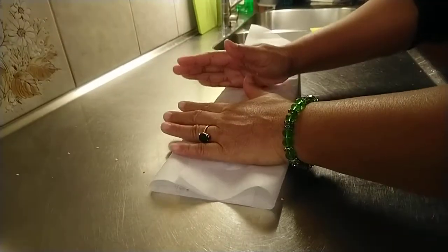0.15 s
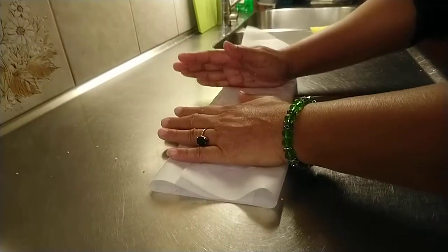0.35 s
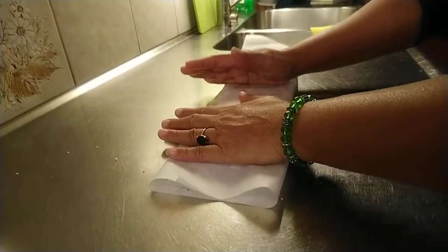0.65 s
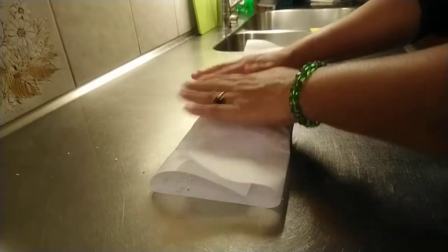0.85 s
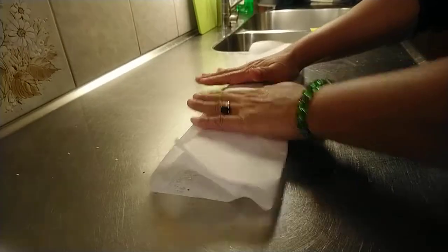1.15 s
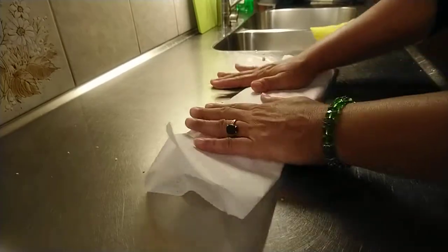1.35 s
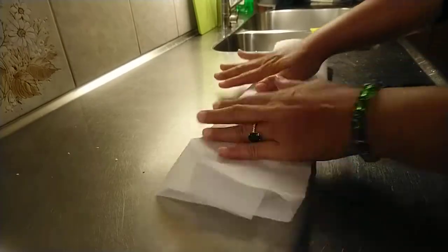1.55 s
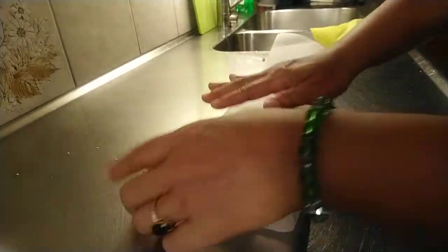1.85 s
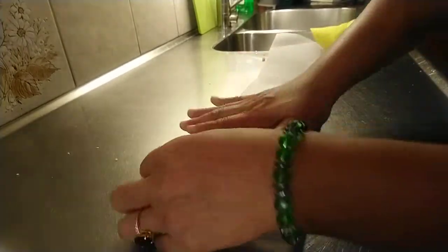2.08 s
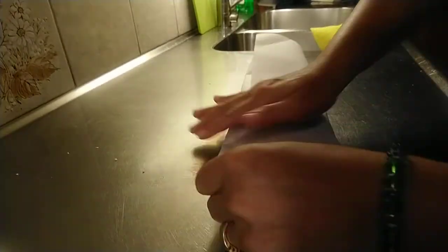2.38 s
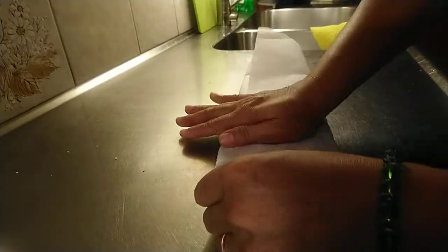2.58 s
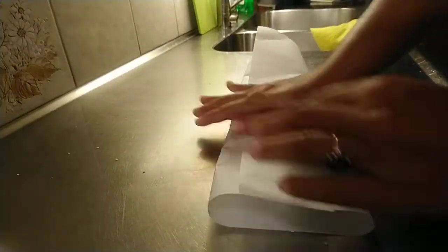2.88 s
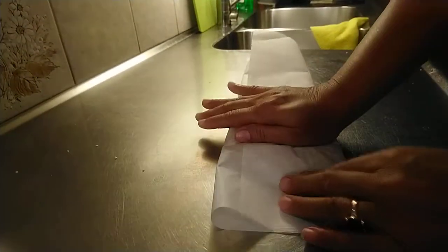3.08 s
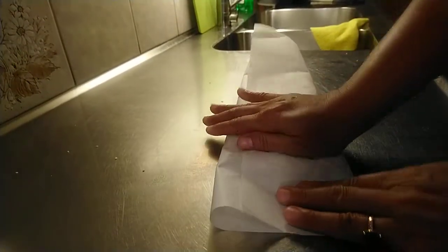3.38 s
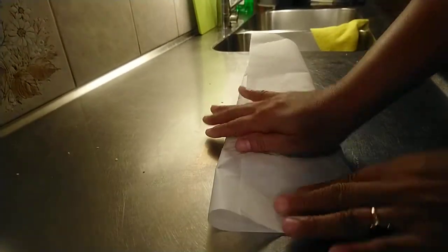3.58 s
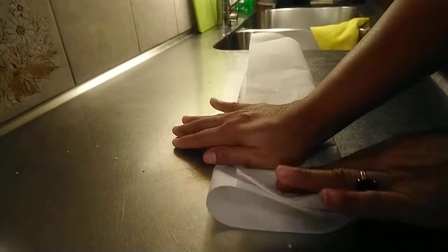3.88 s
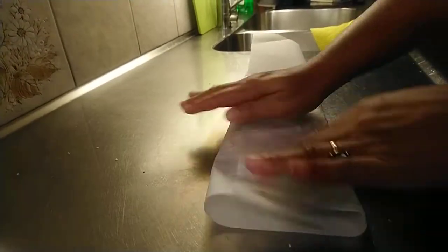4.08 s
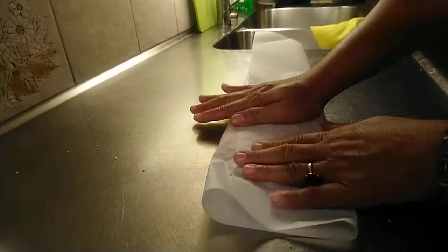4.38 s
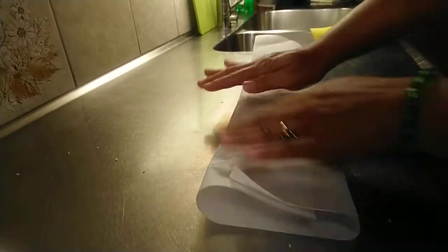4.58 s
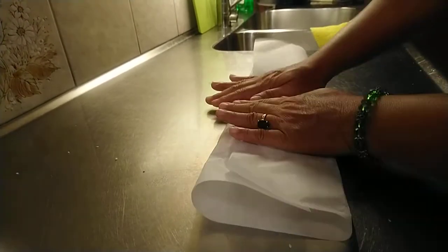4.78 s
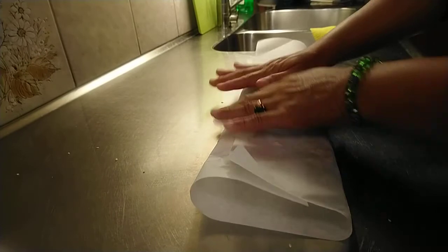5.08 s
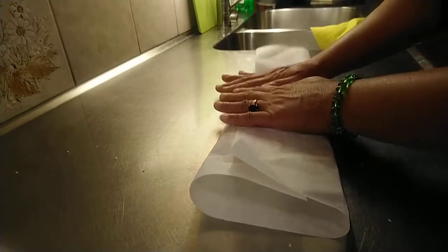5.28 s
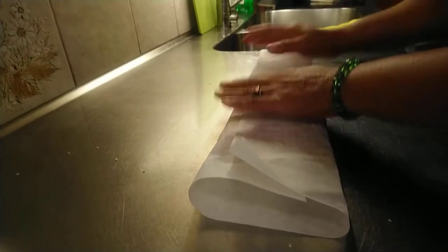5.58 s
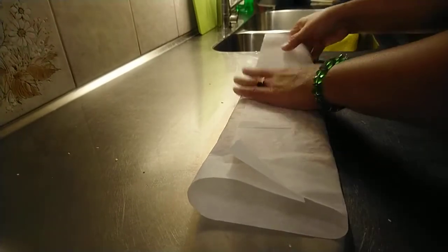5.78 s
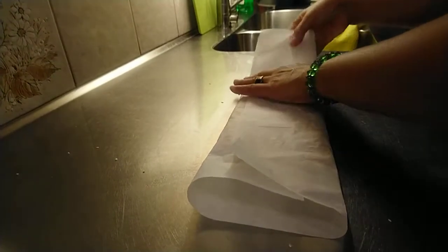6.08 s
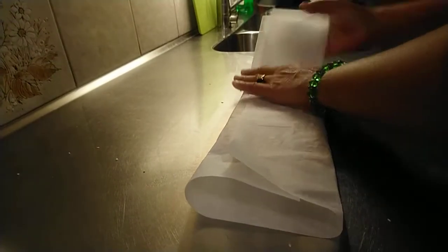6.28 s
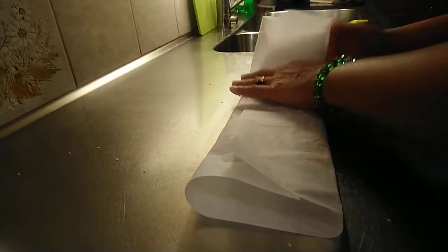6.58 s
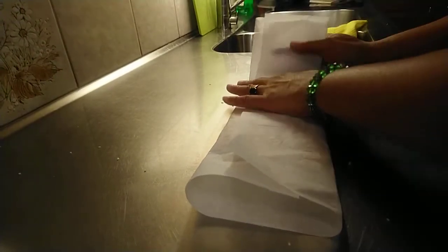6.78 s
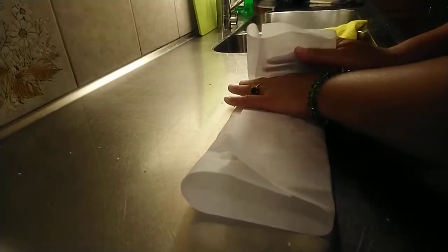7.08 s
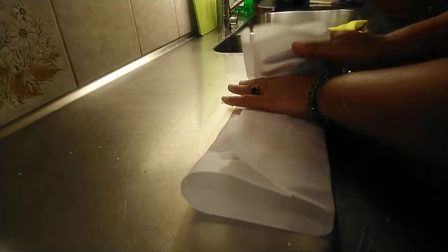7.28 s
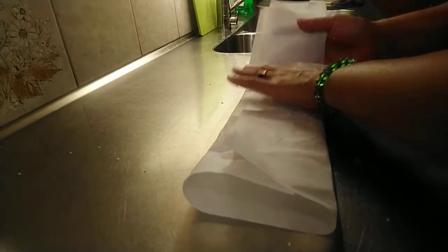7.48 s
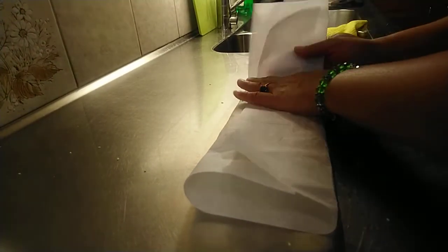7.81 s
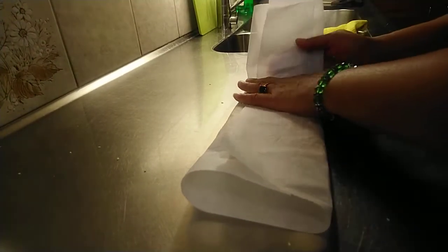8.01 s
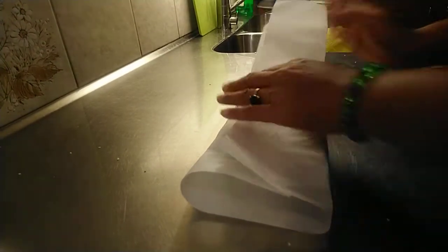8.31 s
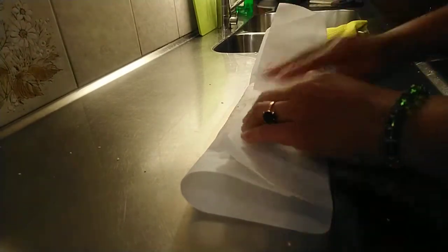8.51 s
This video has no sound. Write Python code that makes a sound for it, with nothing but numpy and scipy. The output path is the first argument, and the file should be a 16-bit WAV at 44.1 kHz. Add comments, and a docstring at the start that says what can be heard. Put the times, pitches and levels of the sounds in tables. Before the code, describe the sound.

A close, dry take of hands folding stiff wrapping paper on a steel counter in a small tiled kitchen. From 0 s soft, dull rustles slide in short strokes with small creases clicking; by 0.8 s two low palm thuds land and the crinkling strengthens, with crisp snaps around 0.9 and 1.4 s. After a short lull near 1.7 s, a dense run of crackles and hollow pops fills 1.9 to 2.3 s. Irregular rustles and light pats continue, with a soft thud near 2.8 s and a sharp snap at 3.8 s. It thins around 4 s, then a bright swish at 4.2 s. Pressing grows heavier from 4.7 to 5.8 s, with several thuds and a strong crackle. From 6 s the paper is brighter and thinner, with a loud swish near 6.8 s, busy crinkles to 7.8 s, then quieter rustling to 8.6 s. Faint room noise and slight metallic ring throughout.

```python
"""Hands press and fold wrapping paper over food on a steel kitchen counter, close to the microphone.
From the start, over faint room noise, the sliding sheet rustles: clumps of tiny buckles, shaped by strokes.
Soon creases snap through, as runs of jerks with a short papery ring; then palms land with soft, low thuds.
Throughout, a small tiled kitchen echoes the paper and the steel top rings faintly with paper and palms.
"""
import sys
import numpy as np
from scipy import signal
from scipy.fft import rfft, irfft, next_fast_len
from scipy.io import wavfile
from scipy.ndimage import uniform_filter1d

SR = 44100
rng = np.random.default_rng(int(sys.argv[2]) if len(sys.argv) > 2 else 0)


def output_pcm(signal):
    """Save a mono or channel-first signal as 16-bit PCM at the path in sys.argv[1].

    Samples are clipped to [-1, 1] before scaling.
    """
    pcm = np.clip(np.atleast_2d(signal).T, -1, 1) * 32767
    wavfile.write(sys.argv[1], SR, np.round(pcm).astype(np.int16))


N = 381460

# hand strokes sliding the sheet: start t/s, attack/s, hold/s, release t60/s, relative level/dB,
# brightness/(dB/octave), hollow body of the fold/dB, ring of the moving facet f/Hz, ring height/dB
STROKES = [(0.0, 0.0017, 0.0048, 0.16, -50, -1.1, -3.5, 310, 2),
           (0.045, 0.02, 0.083, 0.082, -51.5, -6.2, -32, 900, 8.5),
           (0.134, 0.059, 0.093, 0.44, -46, -2, -5.5, 830, 6),
           (0.439, 0.035, 0.01, 0.54, -41.5, -0.7, 0.5, 1510, 2.5),
           (0.566, 0.008, 0.015, 0.16, -54, 2, -6, 2500, -15),
           (0.632, 0.027, 0.032, 0.39, -45, -3, -7, 1630, 1.5),
           (0.77, 0.057, 0.11, 0.25, -43.5, -2.6, -12.5, 313, 7.5),
           (1.076, 0.071, 0.12, 0.19, -42, -2, -9, 2062, 4),
           (1.388, 0.084, 0.0056, 0.28, -40, 1.3, 7.5, 4770, 3),
           (1.555, 0.084, 0.0057, 0.12, -63.5, 6.5, 19, 2030, 19.5),
           (1.82, 0.045, 0.064, 0.18, -65.5, -6, 12, 790, 3),
           (1.867, 0.024, 0.24, 0.43, -50, -1.5, -0.5, 340, 5.5),
           (1.986, 0.047, 0.008, 0.6, -42.6, -2.3, -14, 4910, 6),
           (2.112, 0.009, 0.015, 0.12, -35.5, 0.9, 3.5, 2520, 3.5),
           (2.206, 0.0059, 0.057, 0.35, -41.5, -2.5, -19.5, 3900, 0),
           (2.42, 0.061, 0.0092, 0.41, -44.4, -3, -10.5, 4440, 4.5),
           (2.563, 0.089, 0.069, 0.41, -48, -1.0, -1.5, 3150, 4),
           (2.921, 0.091, 0.011, 0.151, -51, -5, -6, 4560, 7),
           (2.981, 0.0071, 0.078, 0.25, -41, -1, -16.5, 1880, 0.5),
           (3.177, 0.0043, 0.0088, 0.5, -56.5, -2, -2, 2960, 10),
           (3.31, 0.011, 0.049, 0.52, -46, -1.8, -17, 3740, 7.5),
           (3.491, 0.063, 0.008, 0.3, -55, -1.2, -9.5, 5540, 6.5),
           (3.696, 0.028, 0.012, 0.35, -42, -2, -11.5, 389, 9),
           (3.697, 0.1, 0.008, 0.16, -39.5, -0.2, -9.5, 3630, 6),
           (3.851, 0.014, 0.12, 0.54, -60, -1, -17, 5550, 10),
           (4.016, 0.01, 0.02, 0.11, -60, 3.5, -12, 2100, 4),
           (4.09, 0.066, 0.04, 0.2, -69.5, -5, -9.5, 1720, 9),
           (4.199, 0.033, 0.0072, 0.24, -35.5, -0.7, -7, 310, 2),
           (4.371, 0.11, 0.0054, 0.15, -61.0, 0.5, -2, 5900, 13),
           (4.662, 0.024, 0.097, 0.44, -43, -4, -17, 1700, 0),
           (4.936, 0.0075, 0.33, 0.5, -51, -3.5, -14, 326, 12),
           (5.134, 0.006, 0.15, 0.27, -47, -1.5, -16, 330, 13),
           (5.424, 0.018, 0.089, 0.424, -55, 2.3, 10, 1580, 9.5),
           (5.639, 0.024, 0.019, 0.082, -52.5, -2.5, 7, 310, 2),
           (5.724, 0.005, 0.04, 0.52, -37, -0.9, -1.5, 3610, 1),
           (5.945, 0.005, 0.19, 0.28, -57.5, 5, 12.5, 5410, 2),
           (6.013, 0.055, 0.086, 0.13, -49, 0.2, -7, 4600, 5.5),
           (6.187, 0.014, 0.102, 0.5, -46.5, -0.5, -6.5, 5110, 3.5),
           (6.361, 0.0045, 0.019, 0.22, -43.5, 1.2, 2, 770, 7.5),
           (6.52, 0.0057, 0.0094, 0.85, -68, 3.5, 1, 870, 13.5),
           (6.679, 0.055, 0.187, 0.067, -47.5, -2.0, -13.5, 855, 5.5),
           (6.768, 0.06, 0.023, 0.28, -34, 0, -3, 4500, 3),
           (7.01, 0.06, 0.039, 0.102, -57.9, -3.5, -15, 630, 12.5),
           (7.062, 0.075, 0.14, 0.18, -47.5, 0.9, -7.5, 910, 6),
           (7.309, 0.016, 0.063, 0.38, -55.5, 4.5, 6, 860, 10),
           (7.489, 0.042, 0.0071, 0.39, -46.8, 2, 0.5, 313, 12.5),
           (7.654, 0.009, 0.02, 0.2, -61, 6.5, 5, 6010, 2),
           (7.747, 0.021, 0.038, 0.25, -37, 0.8, -2, 4930, 3),
           (7.946, 0.053, 0.0062, 0.46, -50, 0.5, 1.5, 1430, 0.5),
           (8.201, 0.0034, 0.1, 0.13, -57, 1.9, -4, 5430, 4.5),
           (8.275, 0.064, 0.088, 0.34, -80.5, -2, 0.5, 338, 11),
           (8.598, 0.011, 0.0063, 0.12, -53, -3, -8.5, 1880, 7)]
# colour of the paper: f/Hz, relative density/dB
SHEET_COLOUR = [(60, -23), (170, -9), (350, 3), (620, 2.5), (950, -6.5), (1250, 0.5), (1950, -1),
                (2500, -6), (3200, -4.5), (4400, -9.5), (5300, -7), (7000, -10), (11000, -7.5),
                (16000, -12.5)]
# still air of the kitchen: f/Hz, relative density/dB
AIR_COLOUR = [(30, 10), (100, 5), (330, -8.5), (700, -12), (2000, -21), (6000, -24), (12000, -27),
              (14000, -36)]
# decay of the kitchen: f/Hz, t60/s
KITCHEN_DECAY = [(120, 0.31), (350, 0.075), (800, 0.033), (2000, 0.14), (5500, 0.13), (14000, 0.035)]
# modes of the steel top and the hollow under it: f/Hz, relative gain at resonance/dB, t60/s
COUNTER_MODES = [(185, -3.5, 0.54), (312, -6, 0.19), (371, -1.5, 0.3), (630, -6, 0.047), (935, 7, 0.075),
                 (1120, -19, 0.37)]
# creases giving way: t/s, level/dB, length of the buckling/s, brightness/(dB/octave),
# ring of the facet f/Hz, ring height/dB
SNAPS = [(0.0905, -37.5, 0.0015, -11, 2100, 11), (0.118, -41, 0.003, -5, 1900, 9),
         (0.222, -42, 0.0034, 0, 840, 12.5), (0.252, -43.5, 0.0037, -10, 900, 11),
         (0.3652, -48.5, 0.0007, -4, 2030, 14), (0.5705, -48, 0.002, 3, 2500, 0),
         (0.639, -52, 0.003, -15, 1640, 10), (0.877, -34.5, 0.011, 1.2, 2790, 5),
         (1.1085, -40, 0.011, -13, 2050, 7), (1.143, -40.3, 0.0015, 1.4, 3800, 6.5),
         (1.4225, -34, 0.0069, -1.5, 4110, 9), (1.4688, -31.5, 0.011, 2.4, 2070, 5.5),
         (1.6367, -48.5, 0.0079, -2, 610, 14), (1.916, -40.3, 0.0087, -1, 310, 24.5),
         (1.972, -39, 0.0067, -4, 1050, 3.5), (2.0214, -36.5, 0.011, 1.3, 2900, 2),
         (2.066, -31.5, 0.011, 1.4, 526, 14), (2.1227, -29, 0.0075, -5.5, 314, 12),
         (2.2235, -31, 0.011, 1, 350, 11.5), (2.407, -42.5, 0.011, -1.5, 670, 4),
         (2.526, -39, 0.0085, 0.8, 557, 7), (2.667, -35.5, 0.0074, 2.3, 4800, 6.5),
         (2.745, -42.5, 0.0086, 3, 1070, 17.5), (2.8266, -46, 0.0041, -1.0, 340, 20.5),
         (2.9116, -41.5, 0.0093, -4.5, 980, 12), (3.0069, -35, 0.0014, -3, 630, 9),
         (3.022, -31.5, 0.011, 0, 1810, 4), (3.092, -49, 0.0007, 4.5, 1640, 14.5),
         (3.187, -49.5, 0.004, 0, 2260, 20.5), (3.393, -39.5, 0.0047, 0.1, 980, 5),
         (3.421, -42, 0.0021, 1, 3440, 6), (3.4483, -46, 0.0023, 0.8, 2810, 10),
         (3.759, -49.5, 0.0012, 3.5, 5400, 15), (3.7804, -28.6, 0.0042, -2, 2890, 9.5),
         (3.7909, -34, 0.011, 1, 1720, 3), (3.8253, -39, 0.0007, 1.7, 3120, 10),
         (3.918, -57.7, 0.0026, 1.5, 1930, 18), (3.989, -63, 0.0015, -1, 1810, 22),
         (4.0302, -57.5, 0.002, 6, 2100, 13), (4.39, -63, 0.0096, -1, 1920, 25.5),
         (4.4198, -45, 0.0085, 2, 630, 8.5), (4.436, -53.5, 0.0007, 3, 2120, 19),
         (4.472, -61, 0.0047, 5.5, 2080, 26.5), (4.49, -48.5, 0.011, 2.5, 308, 12),
         (4.7551, -42.5, 0.011, 2, 4250, 0), (4.791, -37, 0.011, 0.5, 314, 10),
         (4.8515, -33, 0.0025, -2.8, 3460, 2), (4.9507, -34.5, 0.0073, -1, 1912, 0.5),
         (5.0103, -42.5, 0.0018, -1, 2040, 6), (5.0899, -40, 0.0075, -17, 350, 8),
         (5.143, -36, 0.011, -2, 1370, 7), (5.2436, -41.5, 0.0076, -1.0, 630, 9),
         (5.2585, -35, 0.0007, -2.3, 3230, 14), (5.3106, -45.5, 0.0015, 1.5, 3200, 5.5),
         (5.4153, -53.5, 0.0033, 3.8, 3100, 13.5), (5.5257, -40.5, 0.0048, 0.5, 680, 7),
         (5.723, -32.5, 0.011, -5.5, 307, 1.5), (5.8156, -29.5, 0.0099, -2.1, 335, 17),
         (5.949, -48.2, 0.0052, 3, 4910, 9), (6.0686, -38.5, 0.0094, 2.3, 3600, 3),
         (6.206, -44, 0.011, 4.5, 530, 9), (6.2775, -48.5, 0.001, 6, 5000, 11),
         (6.3095, -41, 0.0012, 2.2, 2790, 6), (6.385, -35, 0.0097, -0.3, 2250, 2.5),
         (6.552, -49, 0.0057, 1.5, 5000, 7.5), (6.9063, -40, 0.0007, -4.2, 7450, 21),
         (7.0108, -47, 0.0075, -2, 625, 15), (7.0872, -55.5, 0.0045, 6, 1400, 26),
         (7.1419, -39, 0.0098, -0.8, 1640, 8.5), (7.185, -38.5, 0.0086, -6, 770, 10),
         (7.24, -36.2, 0.011, -11, 1710, 5.5), (7.3268, -43.5, 0.0044, 2.5, 680, 8),
         (7.3646, -58.5, 0.0045, 10, 6070, 8), (7.4074, -44.5, 0.0006, 2.5, 6270, 7),
         (7.439, -57, 0.009, -4, 630, 23), (7.467, -56, 0.0028, -0.8, 322, 26.5),
         (7.504, -45.0, 0.0055, 1.5, 7610, 6), (7.531, -34.5, 0.0107, 3, 770, 15),
         (7.572, -40, 0.0064, 0, 1630, 9), (7.662, -48, 0.0027, 6.0, 1330, 7.5),
         (7.942, -51.5, 0.0058, 6.5, 1800, 15), (7.9727, -55, 0.0033, 6, 1460, 24.5),
         (8.0106, -51.5, 0.0025, 7.5, 5730, 7.5), (8.0723, -47.5, 0.011, 2, 860, 8),
         (8.112, -46, 0.0043, 5, 6280, 4), (8.2057, -49, 0.0088, 7.5, 7500, 2),
         (8.2775, -57.5, 0.0093, 4, 342, 18)]
# palms pushing the parcel onto the counter: t/s, relative level/dB, length/s, mid-push pitch f/Hz,
# skin drag relative to the throb/dB
PRESSES = [(0.275, -59, 0.066, 107, -10), (0.442, -49.5, 0.041, 85.4, -9.5), (0.663, -48.5, 0.019, 135, 2),
           (0.783, -35.5, 0.032, 89, -12.5), (0.885, -36.5, 0.058, 98, -6.5), (1.11, -43.5, 0.03, 185, 1),
           (1.252, -46, 0.031, 84.4, -15), (1.842, -42.5, 0.048, 114.6, -5), (1.914, -46.5, 0.056, 124, -2),
           (2.018, -52.5, 0.074, 107.4, -8), (2.21, -53.5, 0.0356, 221, 4), (2.479, -54.5, 0.063, 107, 2),
           (2.588, -50.5, 0.016, 113, -6), (2.693, -51.5, 0.011, 194, 11), (2.771, -37.5, 0.037, 80, -10),
           (2.955, -49.5, 0.02, 154, -3), (3.026, -46.5, 0.032, 114.5, -3), (3.223, -53, 0.02, 84, -2),
           (3.289, -51.5, 0.051, 106, -6.5), (3.459, -48.5, 0.015, 142, 2),
           (3.557, -49.5, 0.03, 114.5, -17), (3.662, -51.5, 0.04, 100, 2.5), (4.231, -38, 0.052, 96, 0.5),
           (4.481, -48.5, 0.026, 99, -14), (4.68, -44.5, 0.055, 86.7, -1), (5.001, -48.5, 0.027, 122, 6.5),
           (5.077, -47, 0.028, 109, -16), (5.163, -38.5, 0.086, 94.3, -4), (5.463, -37, 0.045, 104.3, -7.5),
           (5.582, -38, 0.032, 70.4, -20), (5.666, -34.5, 0.031, 161, 14),
           (5.704, -43.5, 0.083, 142.4, -1.5), (5.786, -45.5, 0.087, 122, 1), (6.152, -52.5, 0.023, 122, 3),
           (6.73, -45.5, 0.032, 100, -5), (7.535, -54.5, 0.067, 128, -11), (7.776, -42, 0.033, 108, -7.5)]
EDGE_HZ = 16000


def gain_of(db):
    """Decibels to amplitude."""
    return 10 ** (np.asarray(db) / 20)


def evened(x):
    """Scales to rms 1."""
    return x / np.sqrt(np.mean(x ** 2) + 1e-20)


def read(points, hz):
    """Reads a table along a log-frequency axis."""
    f, value = np.transpose(points)
    return np.interp(np.log(hz + 1), np.log(f), value)


def add(mix, start_s, sound):
    """Mixes a sound in at start_s."""
    part = mix[max(round(start_s * SR), 0):][:len(sound)]
    part += sound[:len(part)]


def wander(per_s):
    """Random curve of rms 1: straight lines between per_s knots a second."""
    knots = rng.standard_normal(N // 20)
    return evened(np.interp(np.arange(N) * per_s / SR, np.arange(len(knots)), knots))


def causal(db, size=1024):
    """Minimum-phase impulse response with the given dB per bin: all ringing follows the onset."""
    log_gain = np.log(gain_of(np.r_[db, db[-2:0:-1]]))
    spectrum = np.exp(np.conj(signal.hilbert(log_gain)))
    return irfft(spectrum[:len(db)])[:size]


def colour(points, hz):
    """A spectrum in dB with unit mean power."""
    db = read(points, hz)
    return db - 10 * np.log10(np.mean(gain_of(db) ** 2))


def facet(hz, bright, body_db, ring_hz, ring_db, body_hz=750, width_octaves=0.42):
    """Colour/dB of one patch of paper: stiff is bright, wide has body, each has its own ring."""
    tilt = bright * np.log2(np.clip(hz, 400, 13000) / 2200)
    body = body_db / (1 + (hz / body_hz) ** 4)
    ring = ring_db * np.exp(-(np.log2((hz + 1) / ring_hz) / width_octaves) ** 2)
    return tilt + body + ring


def buckles(per_s=3200, spread_db=3.0, ring_s=0.00085, ring_db=9, count=24, size=512):
    """Countless tiny buckles, each a short crack from one of many small patches of paper."""
    t, hz = np.arange(size) / SR, np.fft.rfftfreq(size, 1 / SR)
    sizes = gain_of(spread_db * np.minimum(rng.exponential(1, N), 4.5)) * rng.choice([-1, 1], N)
    sizes *= rng.random(N) < per_s / SR
    patch, out = rng.integers(0, count, N), np.zeros(N)
    for k, ring_hz in enumerate(np.geomspace(500, 14000, count)):
        crack = rng.standard_normal(size) * np.exp(-t / ring_s)
        grain = np.convolve(crack / np.linalg.norm(crack), causal(facet(hz, 0, 0, ring_hz, ring_db)))
        out += signal.oaconvolve(sizes * (patch == k), grain[:size])[:N]
    return evened(out)


def avalanches(per_s=75, spread_db=4.5, fade_s=0.0053, steady=0.47):
    """One buckle sets off its neighbours: activity jumps and dies away, over a steady slide."""
    energy = gain_of(spread_db * np.minimum(rng.exponential(1, N), 3)) ** 2
    energy *= rng.random(N) < per_s / SR
    activity = signal.lfilter([1], [1, -np.exp(-1 / (fade_s * SR))], energy)
    activity = steady + activity / activity.mean()
    # the hands supply the energy at an even pace
    return np.sqrt(activity / uniform_filter1d(activity, size=3000))


def ticks(per_s=40, spread_db=3, thin=.7):
    """Single fibres letting go: sparse, thin, very short clicks."""
    sizes = gain_of(spread_db * np.minimum(rng.exponential(1, N), 3)) * (rng.random(N) < per_s / SR)
    return evened(signal.lfilter([1, -thin], [1], sizes))


def stroke(t, attack_s, hold_s, release_s):
    """Envelope of one stroke: the hand speeds up, slides evenly, and the sheet settles."""
    rise = np.clip(t / attack_s, 0, 1)
    return rise * gain_of(-60 * np.maximum(t - attack_s - hold_s, 0) / release_s)


def rustle(level_db=-0.82, ticks_db=-10, hiss=0.17, patch_db=2.5, patches_per_s=70, count=34):
    """Strokes drive clumps of buckles over friction hiss; the radiating facets keep changing shape."""
    t, hz = np.arange(N) / SR, np.fft.rfftfreq(1024, 1 / SR)
    drive = evened((buckles() + hiss * rng.standard_normal(N)) * avalanches())
    drive = drive + gain_of(ticks_db) * ticks()
    size = next_fast_len(N)
    sheet = rfft(signal.oaconvolve(drive, causal(colour(SHEET_COLOUR, hz)))[:N], size)
    centres_hz = np.geomspace(200, 15000, count)
    coarse_t = t[::32]
    power = np.zeros((count, len(coarse_t)))
    for s, attack_s, hold_s, release_s, db, bright, body_db, ring_hz, ring_db in STROKES:
        gain = gain_of(db + facet(centres_hz, bright, body_db, ring_hz, ring_db))
        power += np.outer(gain, stroke(coarse_t - s, attack_s, hold_s, release_s)) ** 2
    # overlapping bands, each swelling on its own as the sheet bends
    place = np.interp(np.fft.rfftfreq(size, 1 / SR), centres_hz, np.arange(count))
    out = np.zeros(N)
    for k, centre_hz in enumerate(centres_hz):
        band = irfft(sheet * np.maximum(1 - abs(place - k), 0), size)[:N]
        bending_db = patch_db * wander(patches_per_s) / (1 + centre_hz / 9000)
        out += band * np.interp(t, coarse_t, np.sqrt(power[k])) * gain_of(bending_db)
    return gain_of(level_db) * out


def kitchen(x, near_db=-6.5, near_s=0.0036, room_db=-13.5, size=22050):
    """Quick reflections off counter and tiles, then a short diffuse tail."""
    t = np.arange(size) / SR
    near, far = rng.standard_normal((2, size)) * (rng.random((2, size)) < 3000 / SR)
    near *= (t > .001) * np.exp(-t / near_s)
    hz, frame_s, z = signal.stft(far * (t > .007), SR, nperseg=256)
    decay_db = -60 * frame_s / read(KITCHEN_DECAY, hz)[:, None]
    tail = signal.istft(z * gain_of(decay_db), SR, nperseg=256)[1][:size]
    echoes = gain_of(near_db) * near / np.linalg.norm(near)
    echoes = echoes + gain_of(room_db) * tail / np.linalg.norm(tail)
    return x + signal.fftconvolve(x, echoes)[:N]


def counter(x):
    """Steel top as parallel resonators, ringing with whatever drives it."""
    out = np.zeros(N)
    for hz, db, t60_s in COUNTER_MODES:
        q = np.pi * hz * t60_s / np.log(1000)
        out += gain_of(db) * signal.lfilter(*signal.iirpeak(hz, q, SR), x)
    return out


def air(level_db=-76.5):
    """Faint steady room noise: shaped white noise."""
    hz = np.fft.rfftfreq(N, 1 / SR)
    noise = irfft(rfft(rng.standard_normal(N)) * gain_of(read(AIR_COLOUR, hz)), N)
    return gain_of(level_db) * evened(noise)


def snaps(ring_octaves=0.35, damped_hz=150, body_db=-9, body_octaves=2.6, ring_s=0.008, ring=0.2,
          release_s=0.00087, jerks_per_s=450, first_jerk=1.2, size=2048):
    """A crease gives way in a quick run of jerks; the sheet rings on for a few milliseconds."""
    t, hz = np.arange(size) / SR, np.fft.rfftfreq(size, 1 / SR)
    unit = np.sqrt(.005 * SR)  # level is the energy spread over 5 ms
    paper, out = colour(SHEET_COLOUR, hz), np.zeros(N)
    dying = np.exp(-t / release_s) + ring * np.exp(-t / ring_s)
    for s, db, length_s, bright, ring_hz, ring_db in SNAPS:
        jerks = rng.uniform(0.75, 1, size) * (rng.random(size) < jerks_per_s / SR) * (t < length_s)
        jerks[0] = first_jerk
        force = np.sqrt(np.convolve(jerks ** 2, dying ** 2)[:size])
        # brittle paper: flatten the spectrum to an evenly bright crack
        spectrum = rfft(force * rng.standard_normal(size))
        crack = irfft(spectrum / (abs(spectrum) + 1e-9) ** 0.32)[:size // 2]
        # wide, low facets are the most damped
        width_octaves = ring_octaves * (1 + damped_hz / ring_hz)
        # body offsets the tilt: bright or dull, a like, thin body
        thin_db = body_db + body_octaves * bright
        patch = facet(hz, bright, thin_db, ring_hz, ring_db, width_octaves=width_octaves)
        sound = signal.fftconvolve(crack / np.linalg.norm(crack), causal(paper + patch))
        add(out, s, gain_of(db) * unit * sound)
    return out


def presses(level_db=-1, drag_hz=190, sag=0.42, wobble=.25, damp_s=0.033, weight_db=-8, weight_hz=56,
            scuff_db=-8, scuff_hz=440, size=12000):
    """Soft push: the padded counter throbs unevenly, lower as the palm settles, and skin drags on it."""
    t, out = np.arange(size) / SR, np.zeros(N)
    dull = signal.butter(2, [drag_hz * 0.37, drag_hz * 1.03], "band", fs=SR, output="sos")
    papery = signal.butter(2, [scuff_hz * .6, scuff_hz * 1.7], "band", fs=SR, output="sos")
    for s, db, length_s, hz, drag_db in PRESSES:
        phase = np.minimum(t / length_s, 1)
        force = np.sin(np.pi * phase * .85) ** 0.28 * np.exp(-np.maximum(t - length_s, 0) / damp_s)
        unsteady = wobble * evened(uniform_filter1d(rng.standard_normal(size), 300))
        pitch_hz = hz * np.exp(sag * (.5 - phase) + unsteady)
        throb = np.sin(2 * np.pi * (np.cumsum(pitch_hz) / SR + rng.random()))
        skin = rng.standard_normal(size)
        scuff = evened(signal.sosfilt(papery, skin ** 3))  # cubed: spikier
        drag = evened(signal.sosfilt(dull, skin)) + gain_of(scuff_db) * scuff
        # the weight of the arm follows the palm, deeper and slower
        arm_hz = weight_hz * rng.uniform(.85, 1.15)
        weight = t * np.exp(-t / (0.64 * length_s)) * np.sin(2 * np.pi * (arm_hz * t + rng.random()))
        thud = evened(force * throb) + gain_of(drag_db) * evened(force * drag)
        thud = thud + gain_of(weight_db) * evened(weight)
        # starts 4 ms ahead of the table time
        add(out, s - .004, gain_of(db + level_db) * evened(thud) * np.sqrt(np.mean(force ** 2)))
    return out


def scene():
    """Paper and palms on the counter; the paper's reflections change as the hands move about."""
    sheet = rustle() + snaps()
    turn = np.pi * np.arange(N) / SR * 2.3
    # three sets of reflections, crossfaded in rotation; shares sum to 1
    shares = [np.sin(turn + k * np.pi / 3) ** 2 / 1.5 for k in range(3)]
    paper = sum(kitchen(sheet * share) for share in shares)
    palms = presses()
    steel = gain_of(-3.5) * counter(paper + 0.39 * palms)
    return (paper + palms + steel + air())[None]


def record(dry, low_cut_hz=40):
    """The small microphone drops the deepest bass; then the band limit."""
    thin = signal.sosfilt(signal.butter(3, low_cut_hz, "high", fs=SR, output="sos"), dry)
    band_limit = signal.firwin(255, EDGE_HZ, window=("kaiser", 8), fs=SR)
    return signal.oaconvolve(thin, band_limit[None], "same")


dry = scene()
out = record(dry)
output_pcm(out)
```